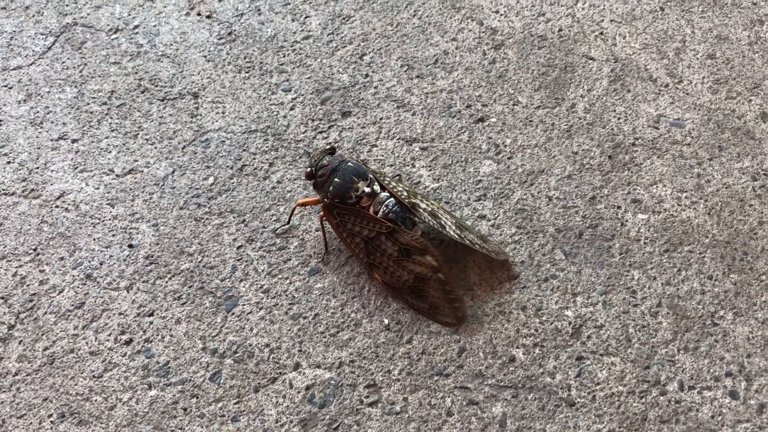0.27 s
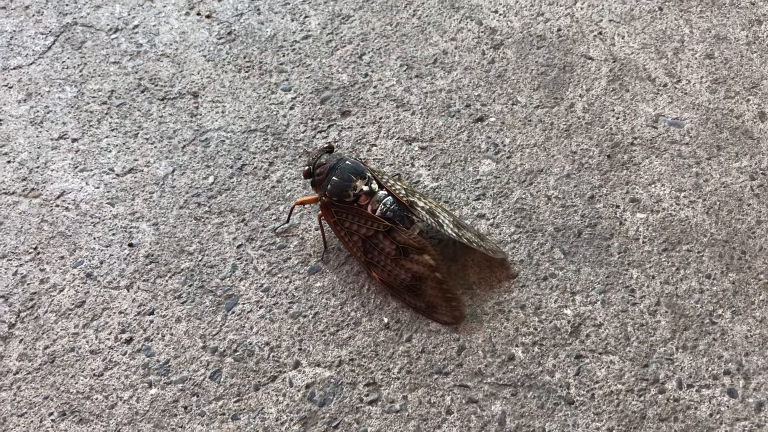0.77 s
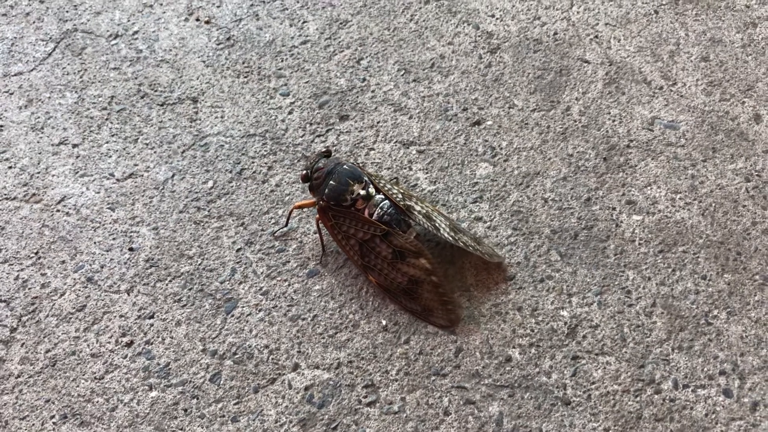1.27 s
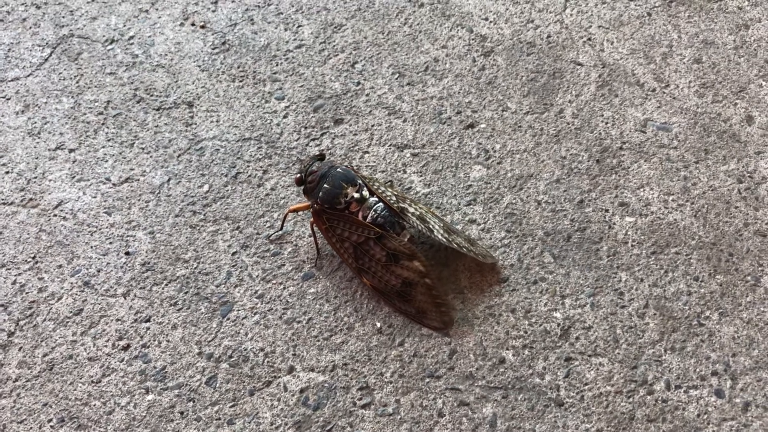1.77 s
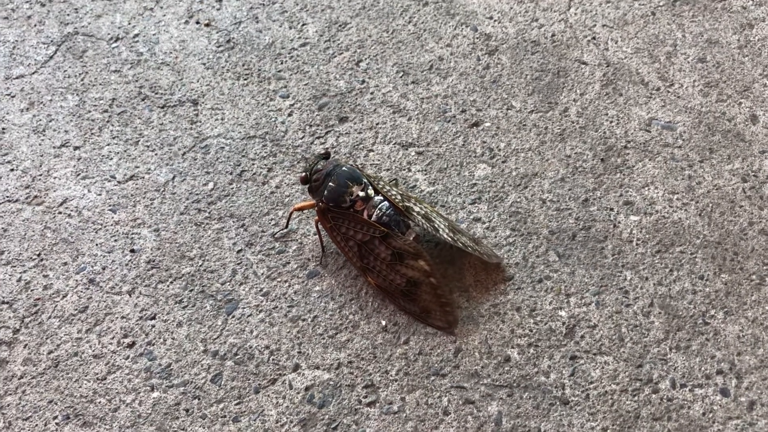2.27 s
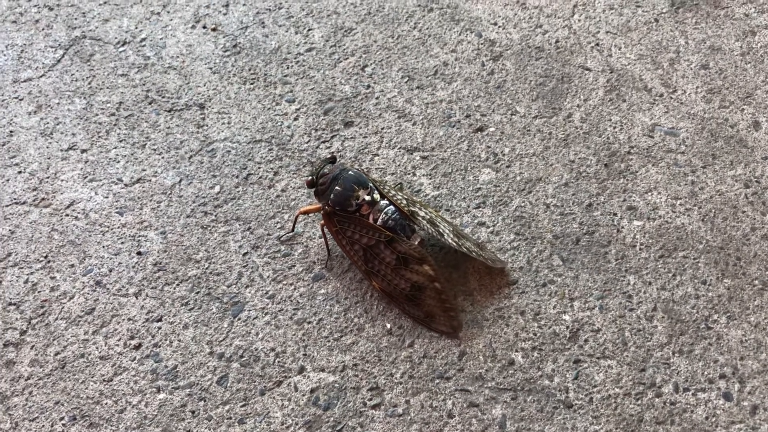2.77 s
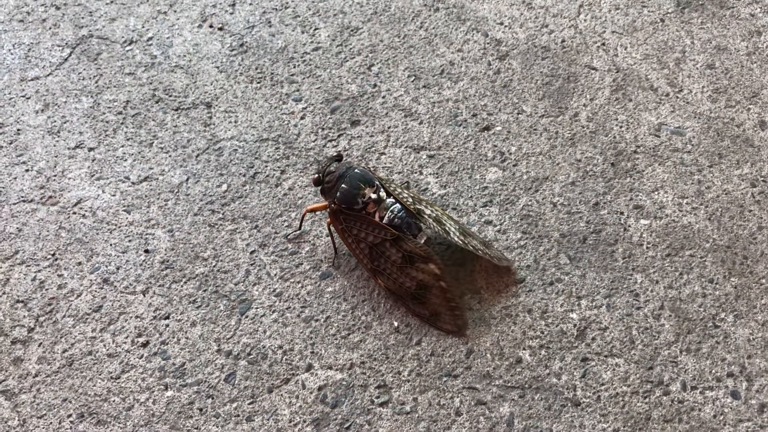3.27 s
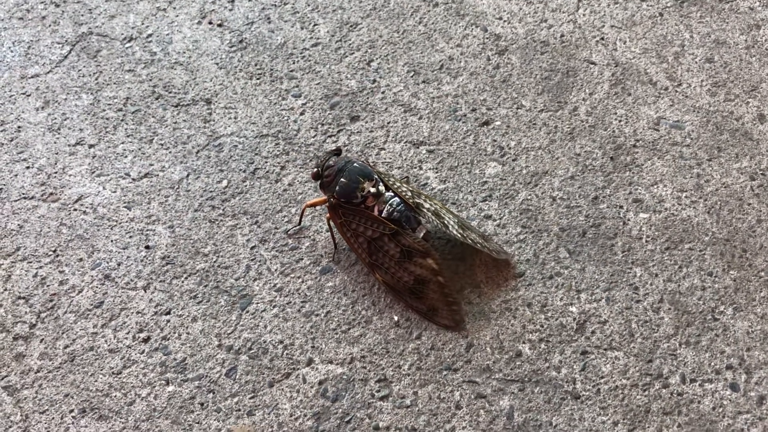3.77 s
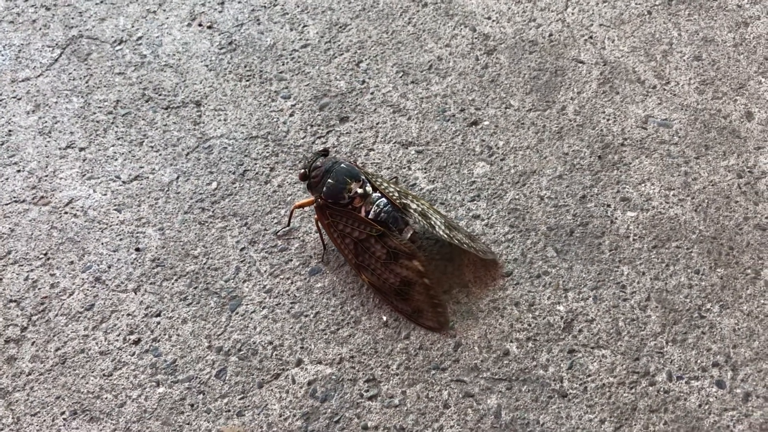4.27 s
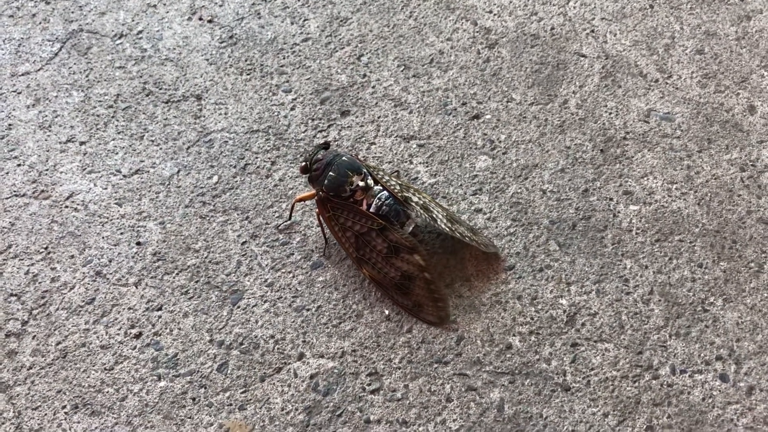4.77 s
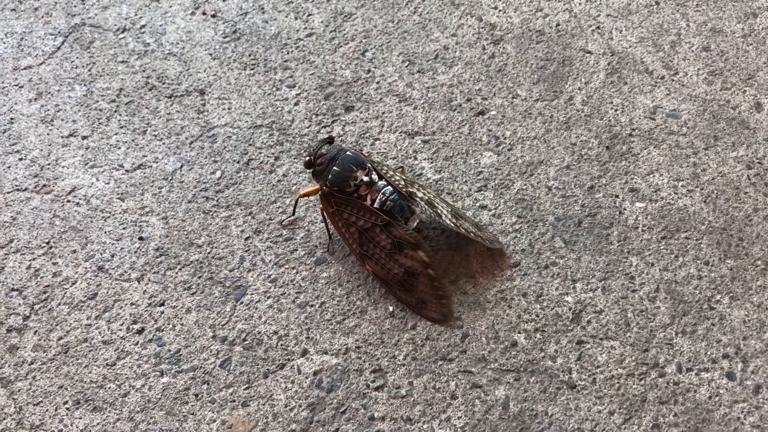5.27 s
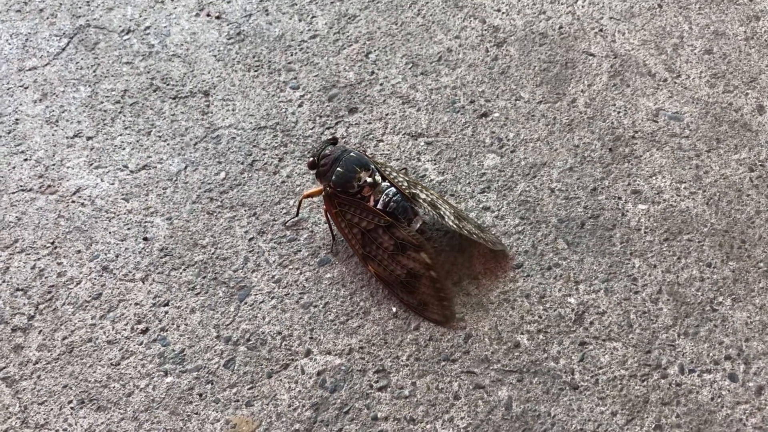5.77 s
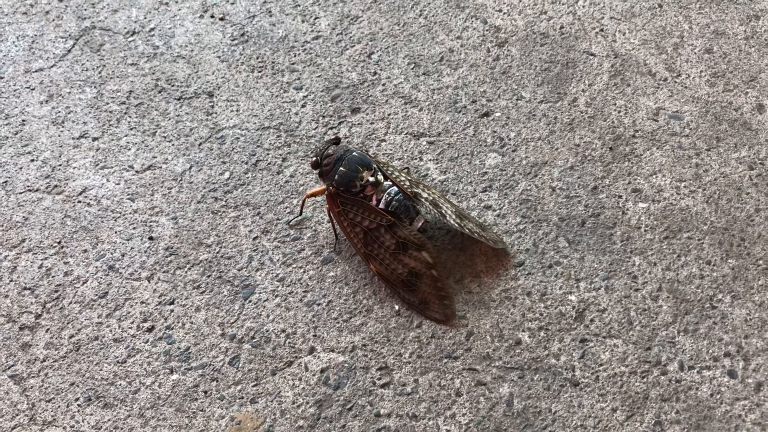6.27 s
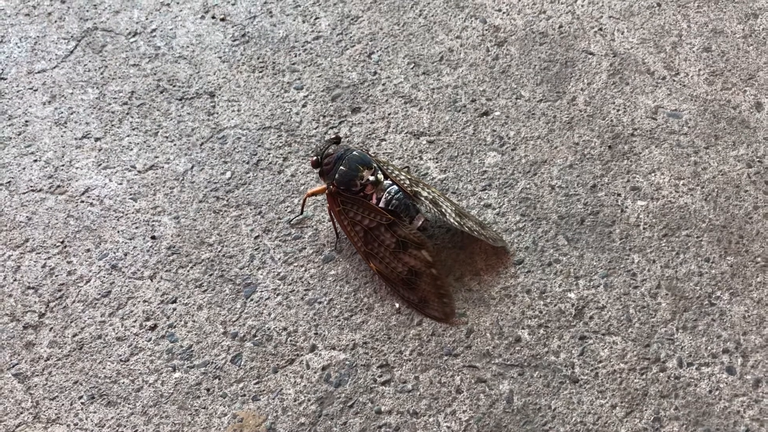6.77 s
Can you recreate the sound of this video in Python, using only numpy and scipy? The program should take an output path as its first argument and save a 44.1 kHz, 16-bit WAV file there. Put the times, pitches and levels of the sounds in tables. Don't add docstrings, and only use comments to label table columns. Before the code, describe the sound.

From 0 seconds a loud cicada is already singing, very close to one microphone, with the same sound essentially centred. Its clicks, roughly 320 a second at first and about 380 by 2 seconds, fuse into a harsh, dry, rattling buzz, strongest around 4 to 9 kHz with brighter fizz above. A rapid throb of about fifteen pulses a second is shallow at the start. Between 1 and 4 seconds it deepens: each pulse sweeps its ringing pitch further upward, turning the fairly flat buzz into a shrill, vigorous wavering. From about 4 seconds it stays fully developed and steady, cutting off mid-song near 7 seconds. Far beneath are low town rumble and slowly beating machine hum, slightly stronger at first and settling within a few seconds, plus a thin constant hiss of distant insects. Brief reflections from concrete and walls add slight outdoor space.

```python
import sys
import numpy as np
from scipy import signal
from scipy.fft import rfft, irfft, next_fast_len
from scipy.io import wavfile
from scipy.ndimage import uniform_filter1d, minimum_filter1d, map_coordinates

SR = 44100
rng = np.random.default_rng(int(sys.argv[2]) if len(sys.argv) > 2 else 0)


def output_pcm(signal):
    pcm = np.clip(np.atleast_2d(signal).T, -1, 1) * 32767
    wavfile.write(sys.argv[1], SR, np.round(pcm).astype(np.int16))


def volts(x):
    e = np.asarray(x, float) / 20
    return 10 ** e


N = 309582


def unit(x):
    return x / np.sqrt(np.mean(np.abs(x) ** 2) + 1e-20)


def along(points, hz):
    f, v = np.transpose(points)
    return np.interp(np.log(hz + 1), np.log(f + 1), v)


def wobble(rate):
    points = rng.standard_normal(int(N * rate / SR) + 4)
    return map_coordinates(points, [np.arange(N) * rate / SR])


def filtered(x, response):
    m = next_fast_len(N + SR // 2)
    return irfft(rfft(x, m) * response(np.fft.rfftfreq(m, 1 / SR)), m)[:N]


def mode(f, hz, width_hz):
    return 1j * f * width_hz / (hz * hz - f * f + 1j * f * width_hz)


def causal(db):
    c = irfft(np.log(volts(db)))
    c[1:len(c) // 2] *= 2
    c[len(c) // 2 + 1:] = 0
    return np.exp(rfft(c))


def abdomen():
    stroke = [(0, .96), (.08, 1), (.16, .85), (.245, .15), (.32, .02), (.45, .04), (.6, .17), (.75, .47),
              (.9, .82), (1, .96)]
    # (t/s at its top, reach 0-1, effort level/dB)
    build = [(.008, 0.07, -3), (.433, 0.13, -4), (.869, 0.18, -4), (1.308, .28, -4.5), (1.767, 0.34, -4.5),
             (2.231, 0.51, -7), (2.701, 0.68, -7.5), (3.184, 0.84, -9.5), (3.671, .93, -10),
             (4.151, 0.93, -10.5), (4.626, 0.95, -11), (5.09, 0.96, -11.5), (5.552, 0.95, -12),
             (6.004, 0.96, -12), (6.451, .99, -12.5), (6.894, 0.93, -12.1), (7.335, .99, -13)]
    strokes_a_row = 7
    luck = rng.standard_normal((strokes_a_row * len(build), 2)).T
    s, reach, effort_db = np.transpose(build)
    k = np.arange(len(luck[0]))
    row = k / strokes_a_row
    late_s = .001 * luck[0]
    tops = np.interp(row, np.arange(len(s)), s) + late_s
    mean = np.interp(row, np.arange(len(s)), reach)
    uneven = .05 * (-1.) ** k * (1 - mean)
    top = np.clip(mean + uneven + .025 * luck[1], 0, 1)
    t = np.arange(N) / SR
    reach_now = np.interp(t, s, reach)
    turn = np.interp(t, tops, k)
    share = (turn - .1 * (reach_now - 1)) % 1
    now = top[(turn + .6).astype(int)]
    lift = now * np.interp(share, *np.transpose(stroke))
    return share, lift, np.clip(reach_now, 0, 1), np.interp(t, s, effort_db)


def click_times(share, reach):
    # (t/s, clicks a second)
    pace = [(0, 322), (.3, 336), (.6, 353), (.9, 365), (1.2, 372), (1.55, 378), (2, 381.5), (3, 384),
            (4.5, 384.6), (7.02, 384.4)]
    t = np.arange(N) / SR
    rate = np.interp(t, *np.transpose(pace))
    sway = .046 * (1 - reach) ** 3
    hurry = .062 * reach ** 1.5
    limp = .001 + .01 * (1 - reach) * (1 + .3 * wobble(10))
    since = np.clip(share - .08, 0, 1) / .055
    downstroke = since ** 2 * np.exp(2 - since) / 4
    drift = .0015 * wobble(12)
    swing = sway * np.cos(2 * np.pi * (share + .08))
    count = np.cumsum(rate * (1 + swing + hurry * downstroke + drift)) / SR
    k = np.arange(1, int(count[-1]))
    side = (-1.) ** k
    limp = np.interp(k, count, limp)
    shake_s = 4e-6 * (1 + 70 * limp) * rng.standard_normal(len(k))
    return np.interp(k + limp * side, count, t) + shake_s, side


def cicada():
    # (f/Hz gained at full lift, width/Hz)
    sac = (2680, 383)
    # (f/Hz at rest, f/Hz gained at most, width/Hz, reach 0-1 where it levels off)
    upper = (11370, 5500, 955, 0.81)
    # (f/Hz, width/Hz)
    ribs = (11400, 900)
    # (f/Hz, level/dB)
    colour = [(1000, -27.5), (1900, -8), (2300, -1.25), (3300, 3), (4600, 0.5), (5500, 6), (6700, 14.5),
              (7600, 12.5), (9000, 5.5), (10300, -10), (11500, -11.5), (13000, 1.2), (14500, 10),
              (15600, 8)]
    sac_gain_hz, sac_width_hz = sac
    upper_hz, upper_gain_hz, upper_width_hz, upper_levels_off = upper
    ribs_hz, ribs_width_hz = ribs
    size = 1024

    share, *motion = abdomen()
    s, side = click_times(share, motion[1])
    luck = rng.standard_normal((len(s), 6)).T[:, :, None]
    f = np.fft.rfftfreq(size, 1 / SR)[None]
    lift, reach, effort_db = [np.interp(s * SR, np.arange(N), c)[:, None] for c in motion]
    s, side = s[:, None], side[:, None]

    drum_hz = (4500 + 602 * reach + 51 * s) * (1 + .004 * side + .004 * luck[1])
    sac_hz = 6016 - 125 * reach + sac_gain_hz * lift + 30 * side + 15 * luck[2]
    sac_ring = mode(f, sac_hz, sac_width_hz * (1 + 0.45 * lift))
    low = mode(f, drum_hz, 525) * mode(f, 4400, 1590) * sac_ring * volts(6.5 + 2.7 * lift)
    low = low * (1 - 0.25 * mode(f, 1.083 * sac_hz, 1470)) * (1 + 0.48 * mode(f, 5405, 304))
    hollow = (1 - 0.93 * mode(f, 0.719 * drum_hz, 540)) * (1 - 0.66 * mode(f, 7930, 830))

    taut = lift / reach * np.tanh(reach / upper_levels_off)
    high = mode(f, ribs_hz + 100 * luck[3], ribs_width_hz)
    high = high * mode(f, upper_hz + upper_gain_hz * taut + 40 * luck[0], upper_width_hz)
    high = high * volts(-8.5 + 16.9 * taut + 6 * lift + 0.19 * luck[4] + 0.31 * side)
    chirp_s_per_hz = 2.5e-7
    high = high * np.exp(-1j * np.pi * chirp_s_per_hz * np.maximum(f - 11000, 0) ** 2)

    belly_hz = 2106 + 982 * np.sqrt(reach)
    belly_db = -36 + 17 * np.sqrt(reach)
    flank = volts(belly_db - 10 + 7.3 * reach + 3.5 * lift)
    flank = flank * mode(f, 0.85 * belly_hz, 350) * mode(f, 1.036 * belly_hz, 344)
    belly = volts(belly_db - 2 - 3.4 * reach + 4.74 * np.sqrt(taut) + 3 * lift / reach)
    belly = belly * mode(f, 0.735 * belly_hz, 645) * mode(f, 0.937 * belly_hz, 380)
    snap_db = [(1200, -90), (2000, -61.5), (3000, -34), (8000, -37.5), (11000, -113.0), (15500, -32.5)]
    snap = volts(along(snap_db, f))

    facing = side * volts(0.42 * side)
    click = facing * (low + high + flank + snap) + belly
    click = volts(effort_db + 0.31 * luck[5]) * click * hollow * causal(along(colour, f[0]))

    rattle = rng.standard_normal((len(s), size)) * volts(-60 * np.arange(size) / SR / .014)
    rattle = rfft(rattle / np.linalg.norm(rattle, axis=1)[:, None])
    loose = along([(2500, .12), (6500, .13), (9000, .5), (12000, .5), (15000, .28)], f)
    click = click * (np.sqrt(1 - loose ** 2) + loose * rattle)

    second_lobe = along([(3000, 0.067), (6000, 0.14), (12000, 0.05)], f)
    click = click * (1 + second_lobe * np.exp(-2j * np.pi * f * 0.001132))

    start = np.floor(s * SR)
    rows = irfft(click * np.exp(-2j * np.pi * f * (s - start / SR)), size)
    at = np.clip(start.astype(int) + np.arange(size), 0, N)
    return volts(29.0) * np.bincount(at.ravel(), rows.ravel(), N + 1)[:N]


def walls(x):
    # (f/Hz, t/s to fall by 60 dB)
    echo_s = [(2000, 0.22), (6000, 0.24), (15000, 0.021)]
    hz, t, z = signal.stft(rng.standard_normal(SR // 8), SR, nperseg=128)
    fading = z * volts(-60 * t / along(echo_s, hz)[:, None])
    tail = signal.istft(fading, SR, nperseg=128)[1]
    return signal.fftconvolve(x, tail / np.linalg.norm(tail))[:N]


def noise(levels):
    return unit(filtered(rng.standard_normal(N), lambda f: volts(along(levels, f))))


def tone(hz, db):
    t = np.arange(N) / SR
    return volts(db + 1.5 * wobble(4)) * np.sin(2 * np.pi * hz * t + .4 * wobble(3))


def town():
    # (f/Hz, level/dB per Hz)
    drone_levels = [(15, -56), (25, -12), (69, -2), (108, -6.5), (125, -11.5), (203, -7.5), (236, -27),
                    (258, -11), (381, -8), (495, -30.5), (563, -21), (717, -28), (772, -19), (862, -22.5),
                    (2100, -21), (2730, -23), (4620, -120)]
    # (f/Hz, level/dB per Hz)
    insect_levels = [(1500, -12.5), (2800, -34), (3800, -8.5), (5000, -16), (6500, 14.5), (8000, -7),
                     (10000, -3), (12000, 9.5), (15500, -12.5)]
    # (f/Hz, level/dB)
    machine_notes = [
        (33.5, -66),
        (100, -55),
        (270, -66),
        (338, -59.5),
    ]
    cancels = [-.8, .22, 1.23, 2.2, 2.8, 3.78, 4.8, 5.8, 6.9, 7.9]
    t = np.arange(N) / SR
    fade_db = 8 * np.exp(-t / 2.6)
    drone = volts(-49 + 0.37 * wobble(4.8)) * noise(drone_levels)
    beat = np.sin(np.pi * np.interp(t, cancels, np.arange(len(cancels))))
    hum = beat * tone(68.5, -48)
    hum = hum + sum(tone(hz, db) for hz, db in machine_notes)
    insects = volts(-32.5 + 1.7 * wobble(2.66)) * noise(insect_levels)
    return volts(fade_db) * (drone + hum) + insects


def noise_patches(x):
    # (t/s at the middle, lowest f/Hz, highest f/Hz)
    patches = [(.49, 9500, 11100), (.49, 13700, 15300), (.58, 14500, 15800), (0.626, 4550, 6200),
               (0.629, 9600, 13200), (0.673, 4000, 6230), (1.21, 7040, 8250), (1.208, 11600, 14000),
               (3.39, 5010, 6200), (6.5, 4200, 5130), (6.689, 7560, 8980)]
    half = 1024
    out = x.copy()
    f = np.fft.rfftfreq(2 * half, 1 / SR)
    fade = np.clip(2.6 * np.hanning(2 * half) - 1.1, 0, 1)
    for s, lo_hz, hi_hz in patches:
        middle = round(s * SR)
        frame = slice(middle - half, middle + half)
        band = rfft(x[:, frame]) * (f > lo_hz) * (f < hi_hz)
        level = uniform_filter1d(np.abs(band), size=24, axis=1)
        hiss = level * np.exp(2j * np.pi * rng.random(band.shape))
        out[:, frame] += fade * irfft(1.32 * hiss - band)
    return out


def scene():
    song = cicada()
    return np.tile(song + volts(-16) * walls(song) + town(), (2, 1))


def low_pass(x):
    return signal.sosfilt(signal.butter(12, 16970, fs=SR, output="sos"), x)


def record(dry):
    dry = np.array([filtered(c, lambda f: f < 15780) for c in dry])
    need = minimum_filter1d(1 / np.maximum(np.abs(dry).max(axis=0), 1), size=97)
    limited = dry * uniform_filter1d(need, size=48)
    mix = noise_patches(limited)
    return low_pass(mix)


dry = scene()
out = record(dry)
output_pcm(out)
```